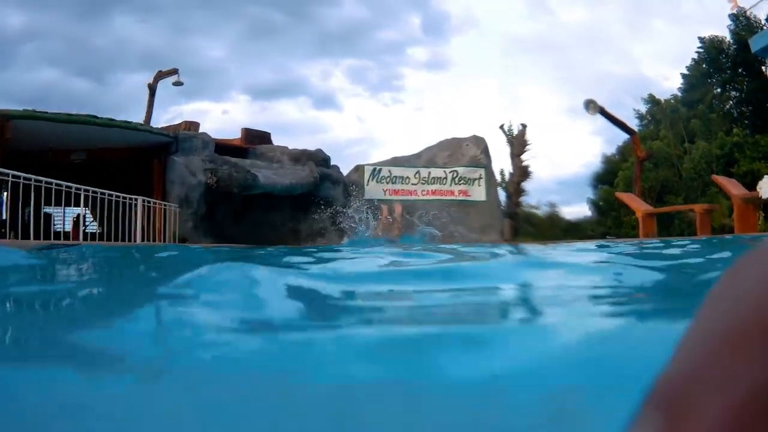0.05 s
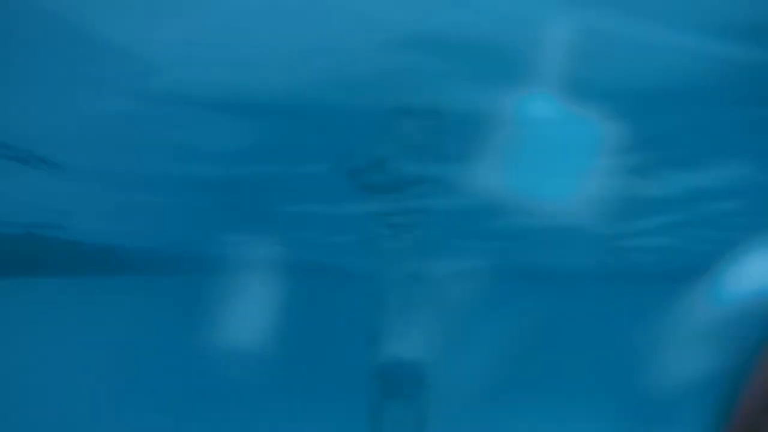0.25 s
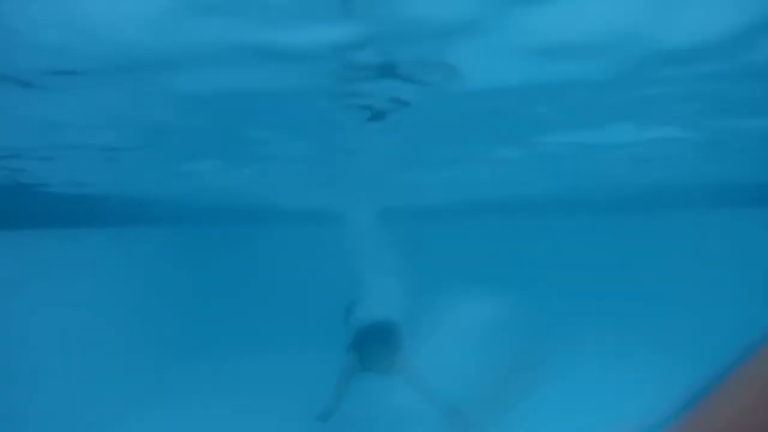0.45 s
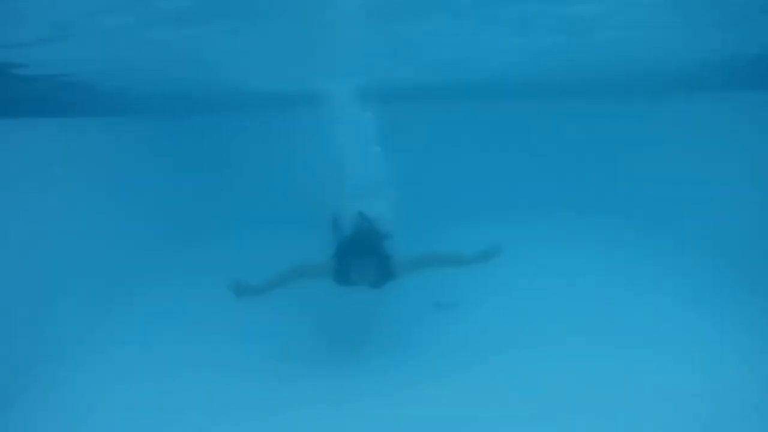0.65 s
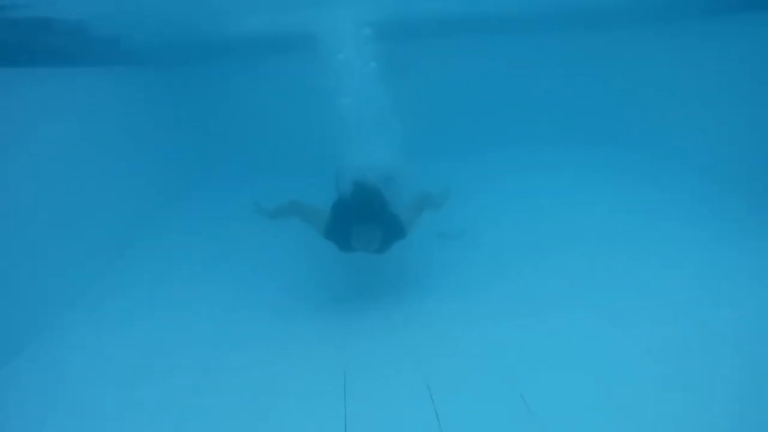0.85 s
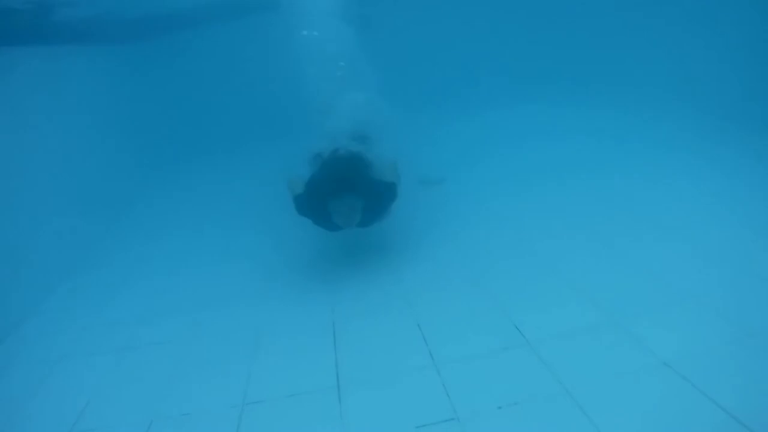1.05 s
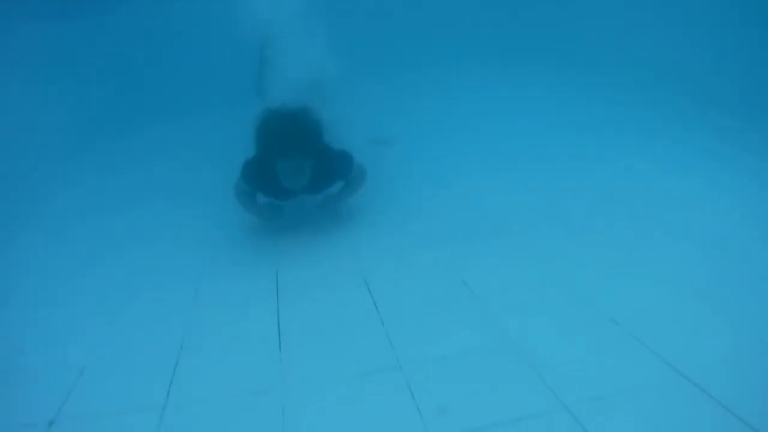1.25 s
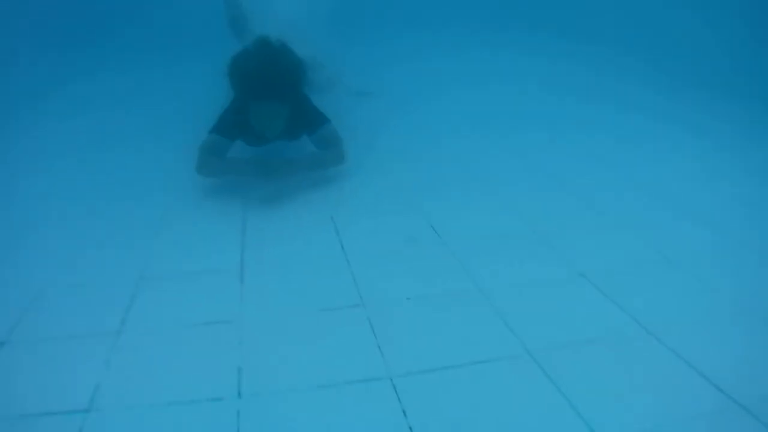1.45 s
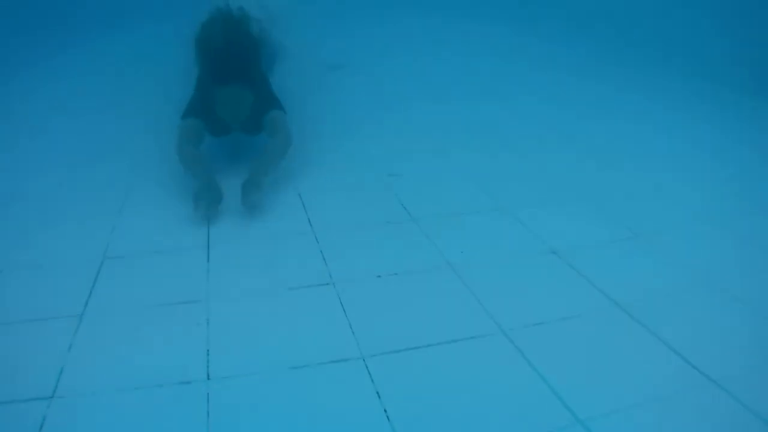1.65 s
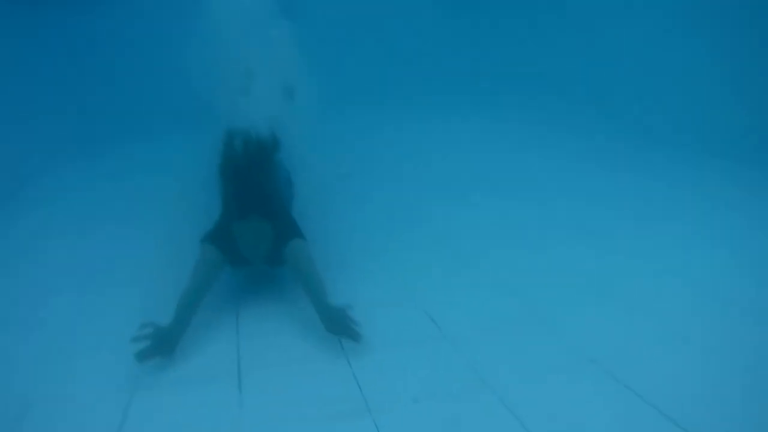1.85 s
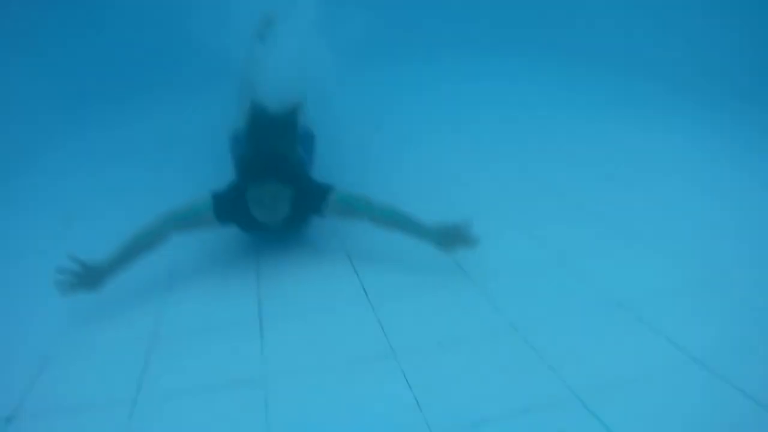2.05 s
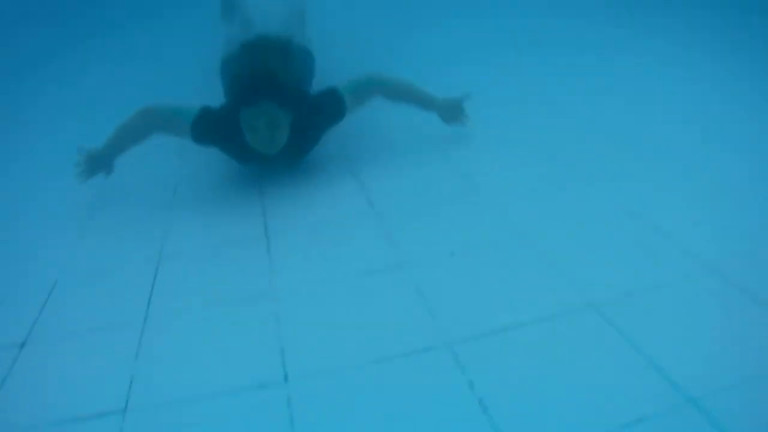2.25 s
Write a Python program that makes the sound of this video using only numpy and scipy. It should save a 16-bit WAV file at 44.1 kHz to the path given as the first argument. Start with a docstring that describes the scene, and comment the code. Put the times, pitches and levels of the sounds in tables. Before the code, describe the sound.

A loud, gurgling splash as the microphone plunges underwater, then muffled wash with stray bubbles and ticks

```python
"""A dive heard from inside a waterproof case

A microphone in a waterproof case dips under the surface of a pool as a swimmer dives in.
Bubbles and air pockets ring as decaying, rising sine tones; slaps are short bursts of coloured noise.
Froth is two random swarms of tiny bubbles over a low noise push; spray and wash are filtered noise.
The biggest bubbles overload the microphone, then the froth dies away to a muffled wash
with stray bubbles and ticks."""
import sys
import numpy as np
from scipy import signal
from scipy.fft import rfft, irfft
from scipy.io import wavfile

SR = 44100
rng = np.random.default_rng(int(sys.argv[2]) if len(sys.argv) > 2 else 0)


def put_to_file(sound):
    """Save the sound as 16-bit audio at rate SR, in the file named by the first command-line argument."""
    columns = np.atleast_2d(sound).T  # one column per channel
    safe = np.clip(columns, -1, 1)
    whole_steps = np.round(safe * 32767)
    wavfile.write(sys.argv[1], SR, whole_steps.astype(np.int16))


N = 101429  # samples, 2.3 s

# Stir of the pool, relative spectrum: (frequency [Hz], density [dB per Hz])
WASH_SPECTRUM = [(12, -30), (20, -1), (64, -16), (238, -12.5), (439, -7.5), (900, -18.5), (4070, -37.5),
                 (15500, -41)]
WASH_DB, SWELL_DB, SWELL_HZ = -61, 1.74, 12  # mean level, rms swell, fastest swell

# Unresolved froth: (time [s], gurgle level before muffling [dB], fizz level [dB], low push level [dB])
FROTH_LEVELS = [(.1, -68, -74, -77), (.228, -58, -55, -78), (.255, -31, -39, -52), (.318, -40.5, -45, -45),
                (.338, -33.5, -61, -35), (.405, -40.5, -44, -43), (.445, -46, -58, -61),
                (.535, -38.5, -60.5, -49.5), (.615, -44, -64.5, -49.5), (.695, -52, -61.5, -49),
                (.74, -58, -80.5, -70.5), (.955, -56, -63.5, -66), (1.06, -64, -75.5, -72.5),
                (1.36, -58.5, -79, -69.5), (1.75, -70, -81.5, -78.5), (2.2, -64.5, -88, -63)]
# Filter curves of the three parts of the froth: (frequency [Hz], gain [dB per Hz])
GURGLE_CURVE = [(100, -11.5), (480, 2), (800, -6.5), (1950, -6), (2700, -17.5), (16000, -56)]
FIZZ_CURVE = [(500, -28), (2000, -5), (3800, 0.5), (8000, -15.5), (9500, -35), (16000, -40)]
PUSH_CURVE = [(30, -5.5), (85, -3), (250, -12.5), (16000, -90.5)]
GURGLE_PER_S, FIZZ_PER_S = 2300, 3200  # mean bubble births per second
SIZE_SPREAD_DB = 3.7  # scale of the random bubble strength
FROTH_CYCLES = 2.4  # decay time in periods of the bubble's pitch
DEEP_S, DEEP_HZ = 0.72, 800  # from this time on the gurgle is heard through water only; its cutoff

# Fine spray while the microphone is half in the air: (time [s], level [dB])
SPRAY_LEVELS = [(.24, -88.5), (.262, -45.5), (.318, -51), (.335, -77.5), (.47, -63), (.76, -76)]
# Spectrum of the spray: (frequency [Hz], density [dB per Hz])
SPRAY_SPECTRUM = [(1000, -7), (4000, -1.5), (9000, -5.5)]

# Single bubbles close to the case: (time [s], level [dB], pitch [Hz], decay [s])
BUBBLE_EVENTS = [(0.1161, -29, 1750, 0.00065), (0.1577, -22.5, 1394, 0.0013), (0.1618, -19, 1730, 0.0011),
                 (0.2016, -22, 447, 0.0038), (0.2038, -9, 1530, 0.00075), (0.2156, -23, 1740, 0.0024),
                 (0.2335, -11.5, 1496, 0.0023), (0.2435, -12.5, 1288, 0.0038), (0.245, -11, 4200, 0.0021),
                 (0.2502, -9.5, 2370, 0.0016), (0.2641, -9.5, 526, 0.0012), (0.2644, -7, 1230, 0.0017),
                 (0.267, -16.5, 3240, 0.002), (0.2923, -4, 1280, 0.0003), (0.299, -11.5, 836, 0.00059),
                 (0.334, 5, 718, 0.0012), (0.3507, -18.5, 530, 0.0014), (0.3515, -14.5, 2208, 0.0016),
                 (0.3748, -8, 705.6, 0.00054), (0.375, -10, 1820, 0.00061), (0.3891, -19, 1150, 0.0063),
                 (0.3966, -14, 2084, 0.0029), (0.3969, -10.5, 3837, 0.0022), (0.4106, 1, 421.2, 0.0031),
                 (0.41, -2, 1520, 0.00064), (0.4291, -26.5, 2000, 0.0026), (0.491, -24, 2060, 0.0011),
                 (0.5004, -19, 893, 0.0032), (0.4997, -24, 540, 0.0018), (0.5137, -20.5, 373, 0.0024),
                 (0.516, -22.5, 1360, 0.0019), (0.5214, -16, 774, 0.00081), (0.5218, -12.5, 1893, 0.0024),
                 (0.536, -26.5, 3130, 0.0048), (0.5504, -23, 490, 0.008), (0.5524, -31, 3760, 0.0027),
                 (0.5659, -24, 1100, 0.0028), (0.5669, -33, 2890, 0.0035), (0.584, -26, 1910, 0.003),
                 (0.598, -33, 1730, 0.0033), (0.6392, -36, 3450, 0.0016), (0.6533, -32.5, 1737, 0.004),
                 (0.695, -30.5, 1188, 0.00074), (0.7792, -46.5, 633, 0.0045), (0.9493, -31, 3870, 0.0018),
                 (0.95, -31.5, 672, 0.00068), (0.9504, -39.5, 1210, 0.004), (0.9605, -24, 2750, 0.00098),
                 (1.1665, -47.5, 1338, 0.0062), (1.2972, -45, 400.5, 0.0036), (1.5684, -36.5, 441, 0.0084),
                 (1.9324, -41, 430, 0.0023), (2.2685, -40, 356, 0.0025), (2.2704, -35.5, 1910, 0.0024)]
RISE_CYCLES = 0.74  # attack time of a ring in periods of its pitch
CHIRP_PER_S = 2.8  # share of its starting pitch that a ring climbs per second
SPLAT_DB, SPLAT_S, SPLAT_OCTAVES = -20.5, 0.0014, 0.5  # level re the ring, decay, spectral spread

# Drops and water edges that strike the case: (time [s], level [dB])
SLAP_EVENTS = [(0.1166, -41.5), (0.16, -23.5), (.199, -32.5), (0.203, -34), (0.2363, -22), (0.2454, -16),
               (0.2498, -11), (0.2656, -19.5), (0.276, -32), (.290, -27), (0.2928, -23.5), (.300, -22),
               (0.3049, -24), (0.335, -20.5), (.352, -28.5), (0.3611, -24), (0.3639, -22), (.376, -31),
               (.383, -26), (0.3889, -29.5), (0.3929, -18), (0.3977, -13), (0.4116, -24), (0.4316, -31),
               (0.458, -38), (0.4917, -34), (0.523, -31), (0.53, -33.5), (0.5841, -34), (0.6753, -45),
               (0.9612, -32.5), (1.0536, -44.5), (2.2702, -42)]
# Colour of a slap on the case: (frequency [Hz], density [dB per Hz])
CASE_SPECTRUM = [(100, -11.5), (450, -7), (1900, 5), (4200, 1), (5300, -3), (8200, -5), (16000, -16.5)]
# Treble of the slaps, varying from moment to moment: (time [s], upper limit [Hz])
TREBLE_LIMIT = [(.12, 5100), (.24, 8700), (.267, 12600), (.318, 15140), (.336, 7200), (.43, 6670),
                (.492, 13700), (.524, 6400), (.585, 8300), (.961, 6620), (2.27, 6400)]
SLAP_S, BURST_RISE_S = 0.0019, 0.00015  # slap decay; attack of every noise burst

# Small air pockets that snap against the case: (time [s], level [dB], pitch [Hz])
POP_EVENTS = [(0.3178, -27, 711.4), (0.3613, -24, 1000), (0.3833, -19.5, 1140), (0.4714, -33, 1380),
              (0.924, -33, 1580), (0.9368, -33, 1690), (0.9473, -27, 1480), (0.974, -32.5, 1060),
              (.982, -40, 1090), (1.0321, -34, 1045), (1.1193, -42.5, 1147), (1.1493, -33, 1053),
              (1.2974, -31, 1076), (1.915, -51.5, 934), (1.9825, -53, 946)]
# Modes of a snap: (multiple of the pitch [ratio], level [dB], decay [s])
POP_PARTIALS = [(1, -5.5, .0012), (2.05, 0, .0009), (2.95, -15, .0008)]

CASE_RING_DB, CASE_RING_S = -20, 0.0045  # level and decay of the case's ringing tail
CLIP_LEVEL = 0.65  # amplitude ceiling of the microphone
EDGE_HZ = 15850  # upper band limit


def amp(db):
    """Logarithmic level: 20 dB is a tenfold amplitude."""
    return 10 ** (np.asarray(db) / 20)


def evened(x):
    """Power normalization: scales x to rms 1."""
    return x / np.sqrt(np.mean(x ** 2) + 1e-20)


def add(mix, s, sound):
    """Superposition: adds a sound to the mix at time s, cut at the end."""
    part = mix[max(round(s * SR), 0):][:len(sound)]
    part += sound[:len(part)]


def colour(x, points):
    """Linear filtering: weights x by a curve over log frequency, then scales to rms 1."""
    hz, db = np.transpose(points)
    f = np.fft.rfftfreq(len(x), 1 / SR)
    gain = amp(np.interp(np.log(f + 1), np.log(hz), db))
    return evened(irfft(rfft(x) * gain, len(x)))


def level(table, axis=1):
    """Amplitude modulation: one dB column of a table as a gain over time."""
    rows = np.array(table)
    return amp(np.interp(np.arange(N) / SR, rows[:, 0], rows[:, axis]))


def ring(hz, decay_s, size=2048):
    """Damped resonance: an air pocket swells into ringing, climbs a little in pitch and dies."""
    t = np.arange(size) / SR
    attack = 1 - np.exp(-(t * hz / RISE_CYCLES) ** 2)
    shape = attack * np.exp(-t / decay_s)
    # The phase is the integral of a linearly rising pitch.
    tone = np.sin(2 * np.pi * hz * t * (1 + .5 * CHIRP_PER_S * t))
    return shape / shape.max() * tone


def burst(noise, decay_s):
    """Impulsive excitation: noise with a sharp attack and an exponential decay."""
    t = np.arange(len(noise)) / SR
    shape = (1 - np.exp(-(t / BURST_RISE_S) ** 2)) * np.exp(-t / decay_s)
    # The rms matches that of the envelope scaled to peak 1.
    return evened(noise * shape) * np.sqrt(np.mean(shape ** 2)) / shape.max()


def wash():
    """Turbulent noise: the dull stir of the pool, swelling slowly and unevenly."""
    slow = np.fft.rfftfreq(N, 1 / SR) < SWELL_HZ
    swell = evened(irfft(rfft(rng.standard_normal(N)) * slow, N))
    stir = colour(rng.standard_normal(N), WASH_SPECTRUM)
    return amp(WASH_DB + SWELL_DB * swell) * stir


def swarm(per_s, curve, low_hz, high_hz, count=30):
    """Shot noise: random births of tiny bubbles in log-spaced pitch classes."""
    out = np.zeros(N)
    for hz in np.geomspace(low_hz, high_hz, count):
        born = rng.random(N) < per_s / count / SR
        strength = amp(SIZE_SPREAD_DB * np.minimum(rng.exponential(1, N), 4))
        voice = ring(hz, FROTH_CYCLES / hz)
        out += hz * signal.oaconvolve(born * strength, voice)[:N]
    return colour(out, curve)


def muffled(x):
    """Low-pass transmission: the upper range is lost within 50 ms as the case sinks."""
    dull = signal.lfilter(*signal.butter(1, DEEP_HZ, fs=SR), x)
    deep = np.clip((np.arange(N) / SR - DEEP_S) * 20, 0, 1)
    return (1 - deep) * x + deep * dull


def froth():
    """Collective bubble emission: gurgle, fizz and the low push of moving water on the case."""
    gurgle = muffled(swarm(GURGLE_PER_S, GURGLE_CURVE, 250, 3000)) * level(FROTH_LEVELS, axis=1)
    fizz = swarm(FIZZ_PER_S, FIZZ_CURVE, 1800, 15000) * level(FROTH_LEVELS, axis=2)
    push = colour(rng.standard_normal(N), PUSH_CURVE) * level(FROTH_LEVELS, axis=3)
    return gurgle + fizz + push


def spray():
    """Dense random impacts: the finest droplets merge into a smooth noise hiss."""
    return colour(rng.standard_normal(N), SPRAY_SPECTRUM) * level(SPRAY_LEVELS)


def bubbles(size=2048):
    """Bubble resonance: each rings, with a wet splat around its pitch as it pinches off."""
    out, f = np.zeros(N), np.fft.rfftfreq(size, 1 / SR)
    for s, db, hz, decay_s in BUBBLE_EVENTS:
        around = np.exp(-.5 * (np.log2((f + 1) / hz) / SPLAT_OCTAVES) ** 2)
        noise = irfft(rfft(rng.standard_normal(size)) * around)
        splat = amp(SPLAT_DB) * burst(noise, SPLAT_S)
        add(out, s, amp(db) * (ring(hz, decay_s) + splat))
    return out


def slaps(size=2048):
    """Impact noise: water clicks on the case, some duller and some brighter."""
    out, f = np.zeros(N), np.fft.rfftfreq(size, 1 / SR)
    for s, db in SLAP_EVENTS:
        top_hz = np.interp(s, *np.transpose(TREBLE_LIMIT))
        noise = colour(rng.standard_normal(size), CASE_SPECTRUM)
        limited = irfft(rfft(noise) / (1 + (f / top_hz) ** 14))
        add(out, s, amp(db) * burst(limited, SLAP_S))
    return out


def pops():
    """Modal superposition: each snap is a sum of short, nearly evenly spaced modes."""
    out = np.zeros(N)
    for s, db, hz in POP_EVENTS:
        snap = sum(amp(mode_db) * ring(hz * ratio, decay_s) for ratio, mode_db, decay_s in POP_PARTIALS)
        add(out, s, amp(db) * snap)
    return out


def housing(x, size=4096):
    """Convolution with an impulse response: the plastic case rings on for a moment after every blow."""
    tail = burst(colour(rng.standard_normal(size), GURGLE_CURVE), CASE_RING_S)
    tail = tail / np.linalg.norm(tail)  # unit energy
    return x + amp(CASE_RING_DB) * signal.oaconvolve(x, tail)[:N]


def scene():
    """Linear superposition: the water's noise plus the close blows that make the case ring."""
    background = wash() + froth() + spray()
    blows = bubbles() + slaps() + pops()
    return (background + housing(blows))[None]


def record(dry):
    """Saturation: the loudest bubbles flatten at the microphone's limit; then a low-pass band limit."""
    clipped = dry / (1 + (dry / CLIP_LEVEL) ** 6) ** (1 / 6)
    low_pass = signal.firwin(511, EDGE_HZ, window=("kaiser", 9), fs=SR)
    return signal.oaconvolve(clipped, low_pass[None], "same")


dry = scene()
out = record(dry)
put_to_file(out)
```